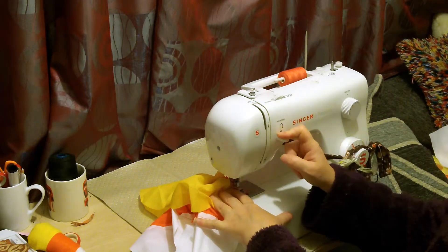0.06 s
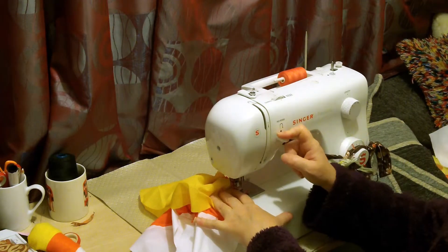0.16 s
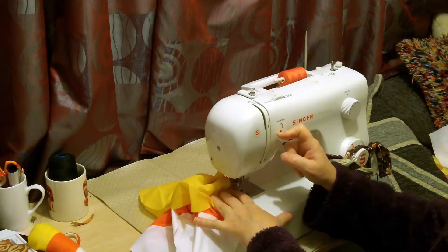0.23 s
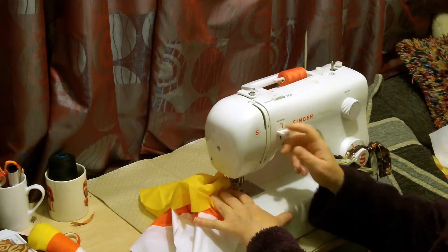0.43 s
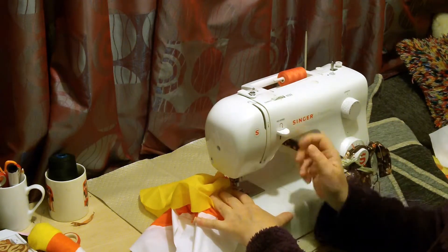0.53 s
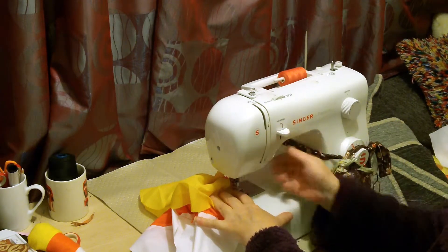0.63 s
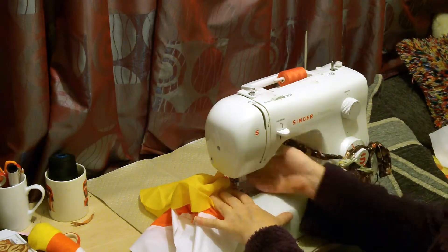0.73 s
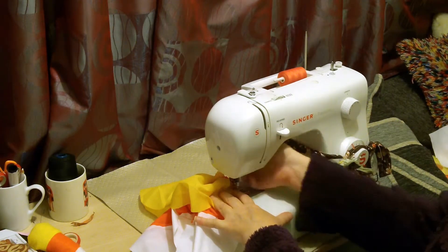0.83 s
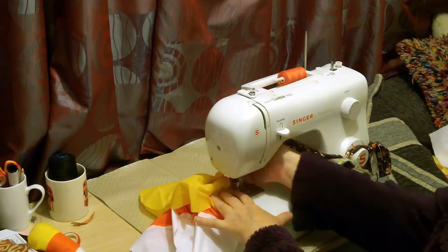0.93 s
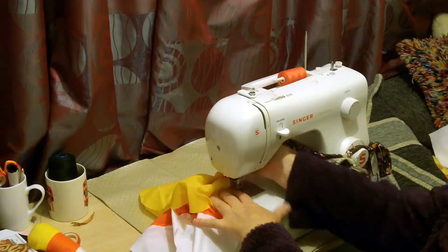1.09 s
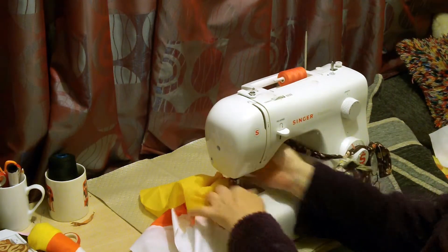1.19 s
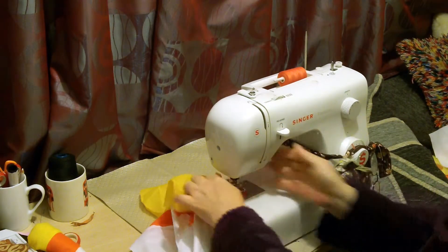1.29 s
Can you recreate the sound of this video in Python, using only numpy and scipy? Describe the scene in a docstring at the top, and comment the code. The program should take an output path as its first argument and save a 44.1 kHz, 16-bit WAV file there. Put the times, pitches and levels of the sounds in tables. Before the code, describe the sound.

A small sewing machine hums and rattles, stops, and then its levers clack and snap.

```python
"""A small electric sewing machine on a table sews a few slow stitches and stops; levers clack and snap after.
Gears and motor shake the plastic casing; each blow rings it, thumps the table and rattles the metal inside.
One light tap rings out and is damped by hand between the last stitch and the levers.
A curtained room answers briefly, over the hiss of a small stereo recorder."""
import sys
import numpy as np
from scipy import signal
from scipy.fft import rfft, irfft
from scipy.io import wavfile

SR = 44100
rng = np.random.default_rng(int(sys.argv[2]) if len(sys.argv) > 2 else 0)


def master_out(mix):
    """Clip the mix to full scale and print it as 16-bit PCM to the path in sys.argv[1]."""
    frames = np.transpose(np.atleast_2d(mix))
    ceiling = np.clip(frames, -1, 1)
    pcm = np.round(ceiling * 32767).astype(np.int16)
    wavfile.write(sys.argv[1], SR, pcm)


N = 59535

# Blows in the mechanism, with relative levels: start_s, table_db, low_casing_db, upper_casing_db,
# clack_db, upper_clack_db, metal_db, fizz_db, rise_ms, rattle_decay_ms
BLOWS = [(0.033, -46.5, -60, -57, -42.5, -53, -73, -66, 1.11, 10.6),
         (0.076, -68, -79, -63, -43.5, -44, -64, -53, 4.2, 7.8),
         (.089, -79, -60, -71, -46.5, -63, -55, -50.5, 0.27, 8.3),
         (0.124, -79, -53, -49, -44, -52, -74, -46, 1.3, 2.6),
         (.145, -50, -34.5, -72, -55, -60, -82, -70, 1.13, 3),
         (0.1767, -73, -62, -72, -50, -60, -77, -49, 2, 3.4),
         (.1994, -81, -36, -68, -63, -54, -66, -51, 0.83, 10),
         (.241, -46, -43, -71, -38.5, -41.5, -72, -44, 5, 5.5),
         (.328, -77, -52, -75, -39, -49, -75, -48.5, 0.8, 1.9),
         (0.3651, -43.5, -41.5, -71, -42, -44.5, -58, -47, 0.25, 5.7),
         (.382, -64, -52.5, -43, -42, -50.5, -62, -45.5, 1.28, 15),
         (0.41, -88, -38.5, -60, -42.5, -49, -48, -50, 0.73, 1.4),
         (0.4638, -72, -71, -50, -42, -51, -70, -50, 2.36, 4.4),
         (0.499, -29.5, -38, -30.5, -29, -33, -37.5, -34.5, 3.5, 8.3),
         (.512, -35, -32, -34, -39, -36, -59, -59, 1.6, 5),
         (.532, -50, -31.5, -23, -20, -24, -35, -27.5, 1.37, 2),
         (.541, -57, -48, -26, -33.5, -42, -55, -40, 0.81, 15),
         (.551, -55, -38, -29, -39, -44, -53, -55, 2.11, 6),
         (.563, -58, -35.5, -36, -41, -51, -55, -70, 2.16, 4.6),
         (0.5811, -54, -79, -71, -42, -35.5, -25.5, -29, 6.85, 6.7),
         (0.603, -57, -39, -73, -70, -60, -33, -33.5, 0.35, 8.9),
         (.619, -85, -36, -49, -41, -44, -42, -40.5, 3.5, 1.8),
         (0.7188, -68, -62, -64, -48, -65, -85, -87, 3.04, 2.2),
         (0.7354, -52.5, -63, -60, -43.5, -53.5, -81, -58, 1.23, 3.3),
         (0.7506, -70, -67, -65, -49, -69, -80, -67, 1.2, 3.2),
         (0.8193, -48.5, -47.5, -52, -59, -76, -82, -80, 0.71, 7.1),
         (0.827, -55, -48, -66, -59, -84, -83, -80, 1.02, 5),
         (0.871, -61, -59, -48.5, -49, -55.5, -56.5, -50, 0.13, 1.3),
         (1.022, -40.5, -67, -52, -47.5, -58, -55, -45, 0.38, 21),
         (1.0327, -40.5, -46, -72, -45, -45, -61, -42, 3.9, 5.4),
         (1.039, -63, -62, -44, -45, -46, -39.5, -31, 3.7, 3.9),
         (1.049, -41, -45, -51, -34, -32.5, -33, -28.5, 4, 2.1),
         (1.055, -39.5, -41, -38.5, -35.5, -43.5, -70, -55, 4.07, 13),
         (1.156, -38.5, -49, -38, -24.5, -30, -27, -24, 1.24, 2.06),
         (1.163, -41, -32.5, -38.5, -30, -31, -37, -45, 1.78, 1.5),
         (1.171, -50, -32.5, -32.5, -33, -36, -39, -53, 1.62, 5)]
# Running gear, with relative levels: time_s, gear_db, treble_db
GEAR_LEVELS = [(0.0, -43.5, -51), (0.046, -51.5, -55), (0.068, -44, -54.5), (0.154, -47, -55),
               (0.192, -43.5, -51), (0.23, -45, -52.5), (0.25, -36, -51), (0.29, -46.5, -50),
               (0.348, -43.5, -51.5), (0.424, -46, -49), (0.47, -43, -50.5), (0.544, -28.5, -48),
               (0.59, -42, -66), (0.65, -47, -51), (0.71, -57.5, -59), (0.8, -89, -88)]
# Low, main and upper modes of the casing, then the table top's: pitch_hz, gain_db, t60_s
CASING_LOW_MODES = [(395.5, -6, 0.18), (434, -3.5, 0.071), (510, 3, 0.094)]
CASING_MAIN_MODES = [(551.2, -2.2, 0.12), (573.2, -0.77, 0.1)]
CASING_UPPER_MODES = [(672.2, -3.5, 0.074)]
TABLE_MODES = [(159.7, -2.5, 0.27), (202, -1, 0.24), (235.5, 5, 0.17), (292.7, 10.5, 0.17),
               (327.6, 3, 0.15)]
# Modes of the clack, its upper range and the metal parts: pitch_hz, gain_db
CLACK_MODES = [(870, 1.5), (975, 5), (1030, -1), (1170, 2), (1243, 0), (1290, 7), (1360, -13), (1450, 2),
               (1540, -14), (1680, 5.5), (1750, -18)]
UPPER_CLACK_MODES = [(1915, -12), (2015, -6), (2175, 3), (2335, -1.5), (2430, -3), (2600, -2), (2660, -32),
                     (2820, -4)]
METAL_MODES = [(3060, 1.5), (3305, -5), (3465, 4), (3750, -1.5), (4000, 2), (4235, 2), (4490, -1.5),
               (4755, -16)]
# Fizz of springs and thread: centre_hz, width_hz, gain_db
FIZZ_BANDS = [(9330, 3470, 3.5), (11830, 4470, 8), (15560, 5200, 8)]
# Modes that sing out on the hardest blows: start_s, pitch_hz, peak_db, t60_s
ACCENT_RINGS = [(.533, 1675, -28.5, 0.09), (.533, 2400, -29.5, 0.034), (.539, 993, -31.5, 0.087),
                (1.05, 2330, -37.5, .1), (1.053, 552, -38, 0.13), (1.157, 1243, -31.5, 0.11),
                (1.158, 4180, -31, 0.044), (1.159, 3313, -33, 0.11), (1.16, 3530, -36, .08),
                (1.162, 967, -32.5, .1), (1.163, 565, -31, 0.14)]
# Brief high pings, likely small metal parts: start_s, pitch_hz, peak_db
PINGS = [(.078, 10700, -44), (.088, 13200, -38), (.412, 6300, -49), (.605, 13600, -23.5),
         (.605, 12400, -44), (1.048, 11600, -22)]
# Jolts of the table legs: start_s, peak_db
LEG_JOLTS = [(0.504, -61), (0.533, -53.5), (1.158, -76)]
# Relative levels of the casing hum, running and then stopping: time_s, low_db, main_db, upper_db
CASING_HUM_LEVELS = [
    [(0.0, -44, -53, -41), (0.024, -52.5, -53, -63), (0.054, -54, -46.5, -63), (0.074, -68, -58, -44),
     (0.094, -43.5, -71, -59), (0.112, -47, -38, -56), (0.13, -54, -47, -54), (0.162, -45.5, -41.5, -46),
     (0.188, -46.5, -63, -51), (0.206, -54.5, -52.5, -52.5), (0.226, -51.5, -45.5, -58),
     (0.252, -47.5, -50, -42.5), (0.29, -43.5, -48, -55), (0.312, -60, -37.5, -51),
     (0.336, -37.5, -52, -50), (0.354, -42, -54, -57), (0.418, -53, -53, -43), (0.45, -44, -38, -60),
     (0.472, -43.5, -49, -56), (0.495, -47, -39.5, -45)],
    [(0.6, -46.5, -44, -58), (0.64, -70, -46.5, -55), (0.664, -60, -45, -61), (0.69, -51, -63, -67),
     (0.726, -70, -57, -62), (0.754, -79, -74, -72), (0.77, -79, -66, -76)],
]
# Spectral shape of the hiss: frequency_hz, density_db
HISS_SHAPE = [(18, -36), (30, -23.5), (204, -16.5), (303, -7.5), (801, -10.5), (1040, -12), (1130, -12.5),
              (1430, -12), (3670, -17), (14400, -18), (16000, -13.5)]

TOOTH_RATE_HZ, TOOTH_SPREAD_DB = 750, 1.5  # mean rate of random contacts, scatter of their strength
LOW_SHARE_DB, MAIN_SHARE_DB = -9.5, 0.5  # how a push divides between the low and main casing modes
STRIKE_DB, TABLE_PUSH_MS = -7, 12  # clean strike against the rattle; time for the table's shove to peak
CLATTER_DB, CLATTER_MS = -11.5, 16.1  # loose parts clatter on after each rattle
CLACK_T60_S, METAL_T60_S, PING_T60_S = 0.1, 0.046, 0.011
JOLT_HZ, JOLT_T60_S = 66, 0.086
TIME_S = np.arange(N) / SR


def sewing_machine():
    """Blows and gears drive eight resonators: table, three casing ranges, two clacks, metal and fizz."""
    parts = [ring(m) for m in (TABLE_MODES, CASING_LOW_MODES, CASING_MAIN_MODES, CASING_UPPER_MODES)]
    parts += [clack(CLACK_MODES, CLACK_T60_S, crack_hz=(720, 2050), crack_db=7.5),
              clack(UPPER_CLACK_MODES, CLACK_T60_S, crack_hz=(1600, 3100), crack_db=7.5),
              clack(METAL_MODES, METAL_T60_S, crack_hz=(2650, 7000), crack_db=-0.5),
              fizz()]
    body = sum(signal.fftconvolve(force, part)[:N] for force, part in zip(blows() + gears(), parts))
    return amp(-5.5) * highpass(body, 392)  # too small to radiate bass


def blows():
    """Each blow shoves the table and rattles the small parts;
    at contact it pushes the casing and strikes the small parts together."""
    size = SR // 8
    t_ms = np.arange(size) / SR * 1000
    force = np.zeros((8, N + size))
    for start_s, table_db, low_db, upper_db, *small_db, rise_ms, decay_ms in BLOWS:
        start = int(start_s * SR)
        contact = start + int(rise_ms * SR / 1000)
        noise = rng.standard_normal((5, size))
        shove = unit(noise[0] * t_ms * np.exp(-t_ms / TABLE_PUSH_MS))
        decay = np.exp(-t_ms / decay_ms) + amp(CLATTER_DB) * np.exp(-t_ms / CLATTER_MS)
        rattle = unit(noise[1:] * ramp(t_ms / rise_ms) * decay)
        force[0, start:start + size] += amp(table_db) * shove
        force[4:, start:start + size] += amp(small_db)[:, None] * rattle
        force[1:4, contact] += amp([low_db + LOW_SHARE_DB, low_db + MAIN_SHARE_DB, upper_db])
        force[4:7, contact] += amp(small_db[:3]) * amp(STRIKE_DB)
    return force[:, :N] * np.sqrt(0.012 * SR)  # a blow packs the energy of 12 ms at its level


def gears():
    """Uneven tooth contacts shake every part while the gears turn."""
    gear_db, treble_db = level_curves(GEAR_LEVELS)
    casing_db = level_curves(CASING_HUM_LEVELS) - 2
    draw, chance = rng.random((8, N)), TOOTH_RATE_HZ / SR
    strength = amp(TOOTH_SPREAD_DB * rng.standard_normal((8, N)))
    teeth = (draw < chance) * np.sign(draw - chance / 2) * strength
    teeth[6:] += rng.standard_normal((2, N))  # smooth noise for metal and fizz
    drive_db = [gear_db - 8.5, *casing_db, gear_db, gear_db - 11.5, gear_db - 11, treble_db]
    return unit(teeth) * np.sqrt(N) * amp(drive_db)


def ring(modes):
    """A struck part rings in decaying modes of alternating polarity."""
    t = np.arange(SR // 4) / SR
    return unit(sum((-1) ** k * amp(db) * np.sin(2 * np.pi * hz * t) * 1000. ** (-t / t60)
                    for k, (hz, db, t60) in enumerate(modes)))


def clack(modes, t60_s, crack_hz, crack_db):
    """A hard part rings with a short unpitched crack on the attack."""
    tone = ring([(hz, db, t60_s) for hz, db in modes])
    crack = band(band(signal.unit_impulse(len(tone)), *crack_hz), *crack_hz)
    return unit(tone + amp(crack_db) * unit(crack))


def fizz():
    """Springs and thread answer a tick with broad bands of treble."""
    tick = signal.unit_impulse(SR // 20)
    return unit(sum(amp(db) * unit(band(tick, hz - width / 2, hz + width / 2))
                    for hz, width, db in FIZZ_BANDS))


def accents():
    """High pings, singing modes and low jolts of the table legs sharpen single blows."""
    pings = [(*ping, PING_T60_S) for ping in PINGS]
    jolts = [(start_s, JOLT_HZ, db, JOLT_T60_S) for start_s, db in LEG_JOLTS]
    return sum(dying_tone(*row) for row in pings + ACCENT_RINGS + jolts)


def casing_hum(pitches_hz=(490.8, 566.7, 653), waver_depth=0.0125, waver_hz=34.5):
    """The motor excites three casing tones that beat against each other and waver in pitch."""
    drift = signal.lfilter(*signal.butter(2, waver_hz, fs=SR), rng.standard_normal((3, N)))
    pitch_hz = np.array(pitches_hz)[:, None] * (1 + waver_depth * unit(drift) * np.sqrt(N))
    phase = 2 * np.pi * (np.cumsum(pitch_hz, axis=1) / SR + rng.random((3, 1)))
    return np.sum(amp(level_curves(CASING_HUM_LEVELS)) * np.sin(phase), axis=0)


def motor(partials_hz=(100, 200), rms_db=(-82, -69.5), stop_s=0.604, fade_s=0.074):
    """Faint mains hum of the windings until the pedal is let go."""
    hum = sum(amp(db) * np.sin(2 * np.pi * hz * TIME_S) for hz, db in zip(partials_hz, rms_db))
    return np.sqrt(2) * hum * ramp((stop_s - TIME_S) / fade_s)


def tap(start_s=0.872, tick_s=0.0012, rise_s=0.0089, held_s=0.017, damp_s=0.013):
    """A light tap: a bright tick and one clear ring that swells until a hand damps it."""
    t = TIME_S - start_s
    burst = rng.standard_normal(N) * (t > 0) * np.exp(-np.maximum(t, 0) / tick_s)
    tick = amp(-28) * band(burst, 11400, 16600)
    tone = dying_tone(start_s, pitch_hz=673, level_db=-40.5, t60_s=0.32)
    return tick + tone * ramp(t / rise_s) * ramp(1 - (t - held_s) / damp_s)


def room(direct, crossover_hz=4350):
    """Curtains keep the answer short: thin in the bass, treble dying first, then a faint longer tail."""
    t = np.arange(SR // 2) / SR

    def reflections(t60_s):
        noise = widen(rng.standard_normal((2, len(t))), split_hz=2780, treble_db=2, full_band_db=-15)
        return unit(noise * 1000. ** (-t / t60_s) * ramp(t / 0.001))

    mids = amp(-7) * band(reflections(t60_s=0.094), 1000, crossover_hz)
    treble = amp(-3.5) * highpass(reflections(t60_s=0.047), crossover_hz)
    tail = amp(-12) * band(reflections(t60_s=0.28), 210, 10600)
    return direct + signal.fftconvolve(direct[None], mids + treble + tail, axes=1)[:, :N]


def lean_right(left, right, shelf_hz=6500, shelf_db=-6, lag_s=18e-6):
    """The left channel gets less treble, a moment later."""
    dull = signal.filtfilt(*signal.butter(1, shelf_hz, fs=SR), left)
    shaded = dull + amp(shelf_db) * (left - dull)
    delay = np.exp(-2j * np.pi * np.fft.rfftfreq(N, 1 / SR) * lag_s)
    return np.array([irfft(rfft(shaded) * delay, N), right])


def hiss():
    """A steady bed of room and recorder hiss."""
    hz, db = np.array(HISS_SHAPE).T
    bins_hz = np.maximum(np.fft.rfftfreq(N, 1 / SR), 1)
    colour = amp(np.interp(np.log(bins_hz), np.log(hz), db))
    noise = irfft(rfft(rng.standard_normal((2, N))) * colour, N)
    return amp(-58.5) * widen(noise / noise.std(), split_hz=306, treble_db=-4, full_band_db=-17)


def widen(noises, split_hz, treble_db, full_band_db):
    """Stereo from a mid and a side noise, wider in the treble than in the bass."""
    mid, side = noises
    side = amp(treble_db) * highpass(side, split_hz, order=1) + amp(full_band_db) * side
    return np.array([mid + side, mid - side])


def dying_tone(start_s, pitch_hz, level_db, t60_s):
    """One struck mode ringing out."""
    t = np.maximum(TIME_S - start_s, 0)
    return amp(level_db) * np.sin(2 * np.pi * pitch_hz * t) * 1000. ** (-t / t60_s)


def level_curves(rows):
    """Fader curves in dB, silent after the last row."""
    times_s, *columns = np.vstack(rows).T
    return np.array([np.interp(TIME_S, times_s, db, right=-120) for db in columns])


def amp(db):
    return 10 ** (np.asarray(db) / 20)


def ramp(x):
    return np.clip(x, 0, 1)


def unit(x):
    """Scale to unit energy."""
    return x / np.sqrt(np.sum(x ** 2, axis=-1, keepdims=True))


def band(x, lo_hz, hi_hz):
    return signal.sosfilt(signal.butter(2, [lo_hz, hi_hz], "band", fs=SR, output="sos"), x)


def highpass(x, hz, order=2):
    return signal.lfilter(*signal.butter(order, hz, "high", fs=SR), x)


def scene():
    """The machine and the tap in the room, leaning right, over the hiss."""
    direct = sewing_machine() + accents() + casing_hum() + motor() + tap()
    return lean_right(*room(direct)) + hiss()


def record(dry):
    """A steep low-pass takes off the very top."""
    return signal.sosfilt(signal.ellip(10, .2, 80, 15330, fs=SR, output="sos"), dry)


dry = scene()
out = record(dry)
master_out(out)
```